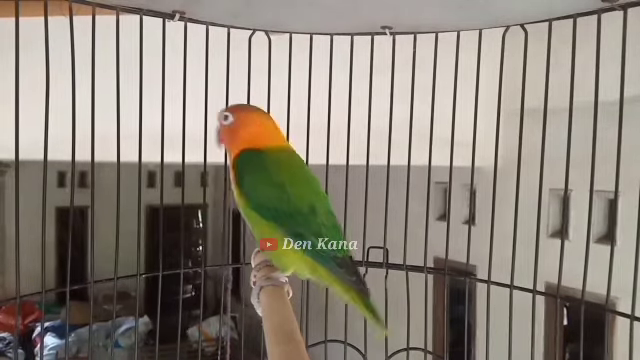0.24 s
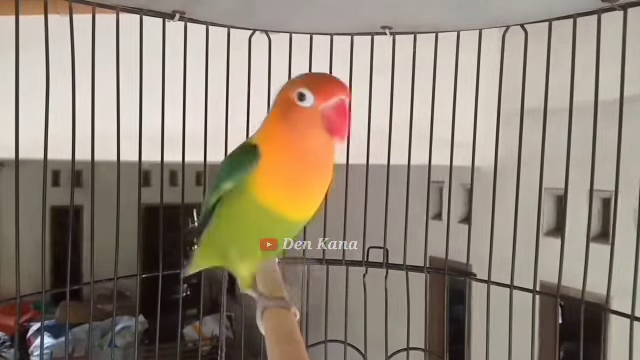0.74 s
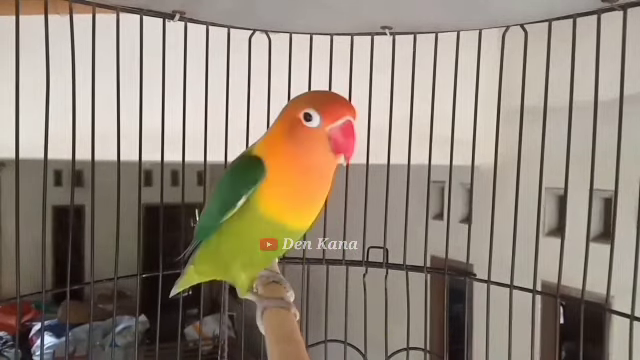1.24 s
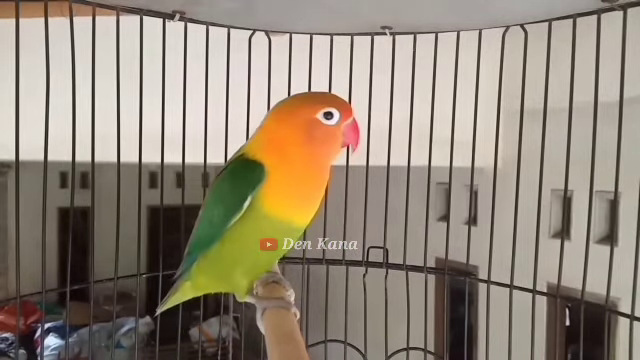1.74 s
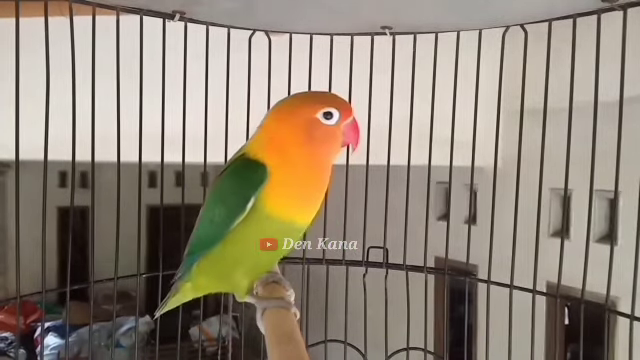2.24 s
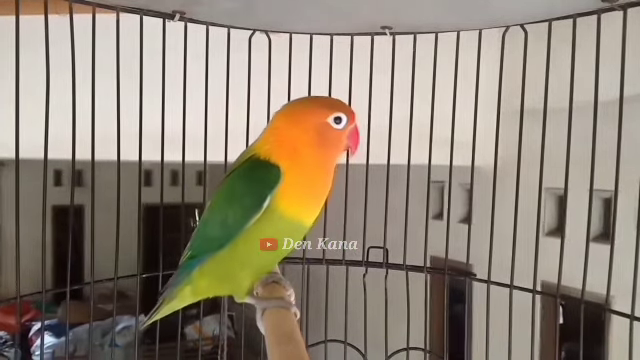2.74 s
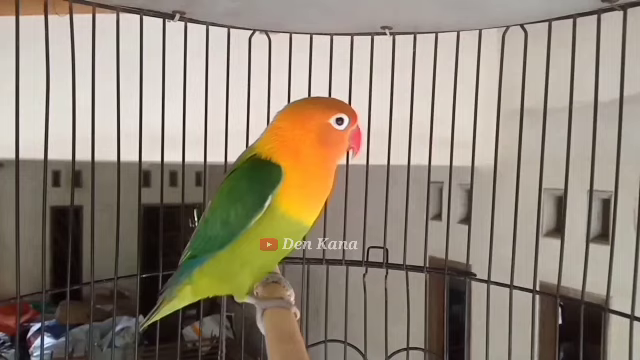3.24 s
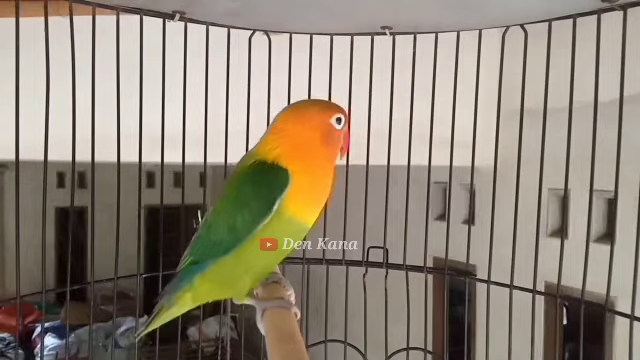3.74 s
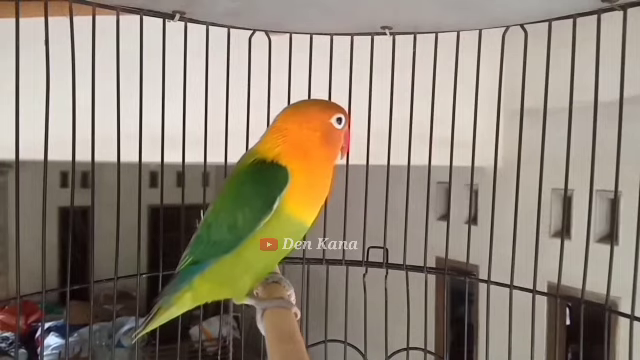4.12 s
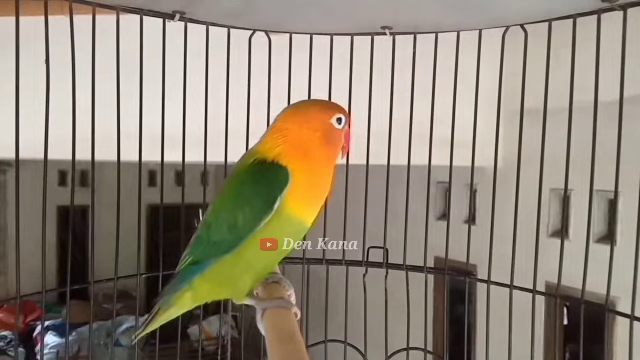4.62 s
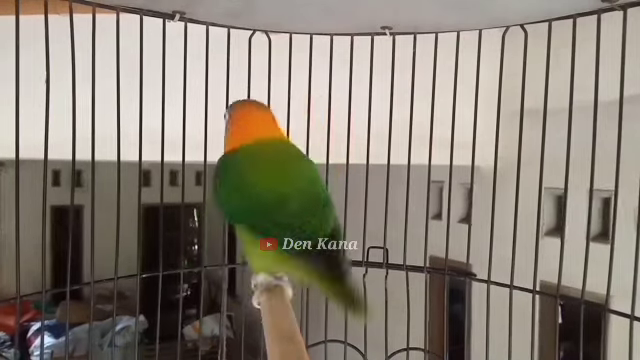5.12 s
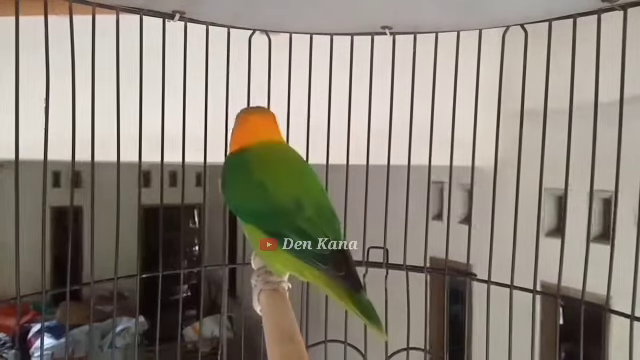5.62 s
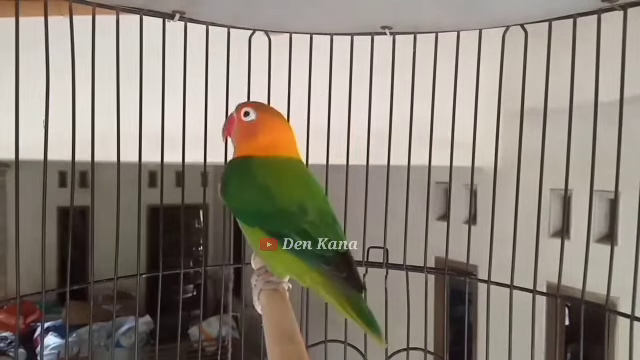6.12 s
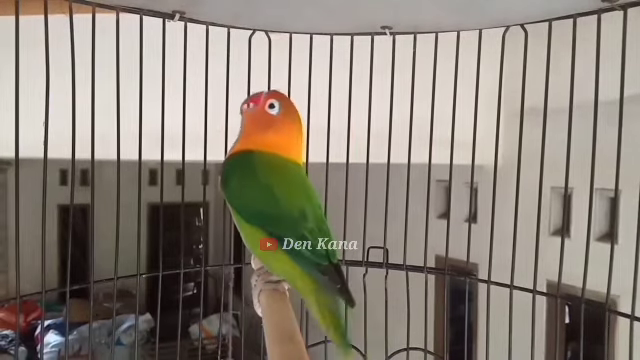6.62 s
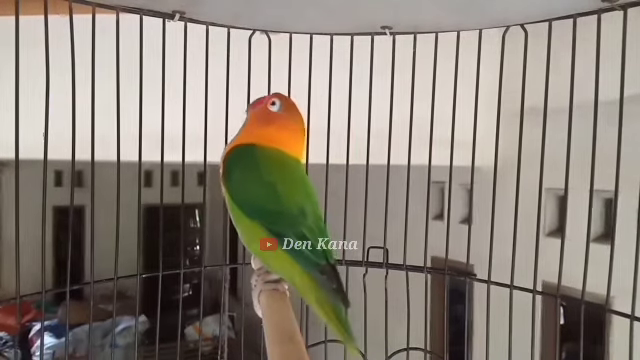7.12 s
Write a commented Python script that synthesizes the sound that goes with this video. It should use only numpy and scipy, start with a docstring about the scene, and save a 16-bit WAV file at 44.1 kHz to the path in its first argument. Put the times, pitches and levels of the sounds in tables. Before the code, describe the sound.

A caged lovebird gives four sharp, widely spaced chirps in a ringing hard-walled room, then a quick yelp and a rapid chattering trill.

```python
"""A hard-walled room, with a caged lovebird close to a phone's microphone.
The bird gives four sharp chirps, each a rasp that locks into a gliding tone, amid small taps of beak and claws.
Then it yelps and breaks into fast chatter: tiny voiced pips, single then paired, shaped by throat and beak.
The room rings after each; behind lie air, rumble, a low wavering hum, a thin whine and a faint far sizzle."""
import sys
import numpy as np
from scipy import signal
from scipy.fft import rfft, irfft
from scipy.io import wavfile

SR = 44100
rng = np.random.default_rng(int(sys.argv[2]) if len(sys.argv) > 2 else 0)


def wav_record(signal):
    """Record a signal, one row per channel, as 16-bit PCM in the file named by sys.argv[1]."""
    frames = np.transpose(np.atleast_2d(signal))
    bounded = np.clip(frames, -1, 1)
    # unit amplitude maps onto the largest positive 16-bit level
    quanta = np.round(bounded * 32767).astype(np.int16)
    wavfile.write(sys.argv[1], SR, quanta)


N = 324576
TIME = np.arange(N) / SR  # s

# spectrum of the room air: [f/Hz, relative level/dB]
AIR_SPECTRUM = [(15, -50.5), (25, -40.5), (76, -2), (206, -8), (373, -9.5), (439, -10.5), (734, -16.5),
                (1290, -17), (2990, -24.5), (3430, -20.5), (4250, -32.5), (7920, -28), (11600, -46),
                (13600, -34.5), (16000, -62)]
# air and low rumble under everything, before their trims: [t/s, air level/dB, rumble level/dB]
BACKGROUND_LEVELS = [(0.0, -57, -59), (0.49, -58, -62), (1.41, -58.5, -57), (1.64, -60, -62),
                     (3.32, -60, -56.5), (3.81, -63, -60), (4.1, -60.5, -53.5), (7.36, -64, -69)]
# the low hum sags, picks up and sags again: [t/s, f/Hz]
HUM_PITCH_PATH = [(0, 170.1), (2, 165.1), (5.15, 139.3), (5.45, 164.5), (6.4, 155.6)]
# swells and lulls of the hum: [centre t/s, half width/s, level change/dB]
HUM_LEVEL_SWELLS = [(.9, .7, -5), (2.95, .27, 11.5), (4.75, 0.26, 8), (5.9, .45, 4), (6.9, 0.62, -7)]
# steady narrow tones, low and high: [f/Hz, width/Hz, level/dB, silent from t/s]
STEADY_TONES = [(202, 2.1, -63.5, 1.35), (436, 14, -62.5, 1.9), (442.7, 41, -67, 5.9),
                (347.6, 3.5, -70.5, 6.7), (3354, 12, -70, 2.8), (13450, 130, -76.5, 6.5)]
# spectrum of the far sizzle: [f/Hz, relative level/dB]
SIZZLE_SPECTRUM = [(1180, -41.5), (2000, -20), (2620, -5.5), (3010, -3), (3740, -10.5), (4150, -11),
                   (4940, -20.5), (6420, -31), (6640, -13.5), (8930, -7.5), (12700, -21.5), (13800, -15),
                   (16000, -29.5)]
# thin tones inside the sizzle: [f/Hz, level above the sizzle/dB]
SIZZLE_PEAKS = [(2923, 11.5), (3400, 13), (4070, 8), (5250, 11), (6837, 12), (7430, 11), (8664, 3.5),
                (8818, 7), (9207, 4), (10470, 6.5), (11040, 3), (11364, 11), (12080, 8.5), (14180, 7.5)]
# swell of the sizzle: [t/s, level/dB]
SIZZLE_SWELL = [(0, -77.5), (2.5, -73), (3.2, -63), (4.4, -61), (5.1, -57.5), (5.6, -58), (5.85, -67.5),
                (7.36, -74)]
# ring of the room by band: [f/Hz, relative level/dB, decay time to -60 dB/s]
ROOM_RING = [(500, -8, .5), (1500, -1, .65), (3000, -.5, .75), (5000, .5, .76), (7000, .5, .62),
             (9500, 1, .52), (15000, 3, .45)]
# reflections from nearby surfaces: [delay/s, gain/dB]
NEAR_ECHOES = [(.0016, -9.5), (.0027, -15.5), (.0046, -23), (.0083, -23.5), (0.0132, -22.5)]
# beak and claw taps: [t/s, level before decay/dB, centre f/Hz]
TAP_EVENTS = [(.518, -46, 1910), (.742, -63, 11000), (0.81, -56, 10000), (.842, -67, 10140),
              (2.5405, -37.5, 2950), (3.683, -59, 1510), (5.018, -49, 9000), (5.283, -53, 9000)]
# throat colour of the opening scrape: [f/Hz, gain/dB]
SCRAPE_COLOUR = [(800, -28), (1450, -19), (1900, -11), (2400, -17), (3200, -2.5), (4300, -11), (5200, -7),
                 (6100, -11), (7200, 4), (8800, -9), (12000, -9), (16000, -17)]
# throat colour of the chirp's squeak and tone: [f/Hz, gain/dB]
CHIRP_COLOUR = [(800, -41.5), (1450, -29), (1950, -13), (2550, -29), (3300, -11), (3900, -13.5),
                (4500, -2.5), (5500, -0.5), (6200, -15), (7400, 6), (8600, -10.5), (10300, -2),
                (12300, -14.5), (14500, -9), (16000, -19.5)]
# chirps: [t/s, scrape level/dB, tone delay/s, tone length/s, tone level/dB, start f/Hz, end f/Hz, treble/dB]
CHIRP_EVENTS = [(0.55, -31, .004, .012, -18, 2600, 2790, -7),
                (1.615, -18, 0.0089, 0.024, -17, 2574, 2406, 0.5),
                (2.568, -24.5, .0066, .036, -15, 2400, 2743, 1.5),
                (3.702, -23, .0104, 0.032, -14.5, 2298, 2750, -4.5)]
# short squeaks by the scrape and tone: [t/s, level/dB, start f/Hz, end f/Hz, treble/dB]
SQUEAK_EVENTS = [(.5515, -16.5, 4540, 4480, -17), (1.6175, -14.5, 3150, 3680, -7),
                 (2.5705, -26, 3580, 3785, -3), (3.7055, -28.5, 3650, 3690, -6)]
# throat colour of the yelp: [f/Hz, gain/dB]
YELP_COLOUR = [(800, -62), (1650, -8.5), (2400, -4), (3900, -2.5), (5000, -8.5), (6200, -18), (7500, -9.5),
               (9200, -24.5), (11500, -26.5), (14000, -53)]
# two-part yelp: [t/s, length/s, level/dB, start f/Hz, end f/Hz, roughness 0-1, odd harmonics/dB, treble/dB]
YELP_NOTES = [(6.102, 0.00717, -15.5, 2700, 2243, .56, -6, -1),
              (6.118, .016, -16.5, 2400, 1700, .33, -3, -1)]
# throat colour of the chatter: [f/Hz, gain/dB]
PIP_COLOUR = [(700, -32), (1100, -21), (1500, -30), (1950, -7), (2550, -5.5), (3100, 2.5), (5000, 0.5),
              (6500, -2), (8600, 3), (9900, -19.5), (11200, -12.5), (12900, -10.5), (14200, -28),
              (15200, -18), (16000, -35)]
# chatter, sharp pip: [t/s, length/s, level/dB, beak resonance f/Hz, harshness 0-1],
# then its soft pip: [length/s (near 0 = silent), level/dB, beak resonance f/Hz]
CHATTER_SYLLABLES = [(6.297, .0045, -18, 2800, .55, 0.000055, 0, 2),
                     (6.358, .006, -15, 3820, .95, 0, -2, 0), (6.4174, .005, -16.5, 3100, .45, 0, 0, 0),
                     (6.4793, .0058, -14, 4400, .55, 0.0053, -25, 3300),
                     (6.5392, .0085, -14, 4500, .55, 0.01, -20, 2960),
                     (6.6013, .0083, -14, 3480, .25, .007, -21.5, 2702),
                     (6.6658, .0054, -14.5, 4670, .9, .0058, -21.5, 2950),
                     (6.7284, .0058, -15.5, 4200, 1, .007, -23, 3630),
                     (6.7942, .0068, -14.5, 4400, .9, 0.0043, -19, 2949),
                     (6.8544, 0.0045, -16.5, 4100, .9, 0.0086, -19, 3098),
                     (6.9204, .0042, -12.5, 4900, .55, .004, -24.5, 3400),
                     (6.987, .007, -13.5, 4800, .45, .005, -19.5, 2800),
                     (7.0548, 0.0055, -17, 3300, .18, 0.0059, -18, 3873),
                     (7.1244, .0052, -18, 3000, .85, 0.009, -18.5, 3150),
                     (7.19, .007, -14.5, 3480, .05, 0.0074, -22.5, 3650),
                     (7.2618, .0042, -14, 5100, .55, .0055, -19, 2698),
                     (7.329, .0048, -18, 3600, .9, 0.0046, -19.5, 2700)]

HUM_DB = -61  # before swells and waver

# the rough, broad scrape that opens a chirp
SCRAPE_S, SCRAPE_START_HZ, SCRAPE_END_HZ = .0112, 2000, 2800
SCRAPE_ROUGH, SCRAPE_ODD_DB, SCRAPE_TREBLE_DB = .85, 0, -1
SQUEAK_S, SQUEAK_ROUGH, SQUEAK_ODD_DB = .0088, .16, -4
# the tone needs a moment to lock, so a shorter one is rougher
TONE_LOCK_S, TONE_ODD_DB = .0017, -17

# the sharp pip sweeps up; a harsher one starts lower, is brighter and rings the beak less
SHARP_START_HZ, SHARP_REACH, SHARP_ARCH_OCTAVES = 2600, 1.08, .38  # start: before harshness and arch
SHARP_ROUGH, SHARP_JITTER = .66, .025
SHARP_TREBLE_DB, SHARP_BEAK_DB = -8.3, 14  # at no harshness
HARSH_DROP_OCTAVES, HARSH_TREBLE_DB, HARSH_BEAK_DB = .85, 7.5, -7
# the soft pip's middle lies ahead of the sharp one; the longer it is, the rougher
SOFT_LEAD_S, SOFT_PITCH_SHARE, SOFT_GLIDE_OCTAVES = .0098, .9, .3
SOFT_TREBLE_DB, SOFT_ROUGH_PER_S = -7.5, 120
# later in the chatter, a faint copy of the soft pip runs ahead of it
STUTTER_FROM_S, STUTTER_LEAD_S, STUTTER_DB = 6.82, .006, -10

TOP_HZ = 15550  # top of the microphone's range


def undb(db):
    """Turn dB into an amplitude factor."""
    return 10 ** (np.asarray(db) / 20)


def level(x, db=0):
    """Set the rms level."""
    return x * undb(db) / np.sqrt(np.mean(x ** 2) + 1e-20)


def curve(rows):
    """The columns of a time table, one value a sample."""
    s, *columns = np.transpose(rows)
    return [np.interp(TIME, s, c) for c in columns]


def colour(hz, points):
    """Read [f/Hz, dB] points on a log-frequency axis."""
    f, db = np.transpose(points)
    return np.interp(np.log(hz + 1), np.log(f), db)


def noise(gain, size):
    """Noise of unit rms whose spectrum is shaped by gain(Hz)."""
    spectrum = rfft(rng.standard_normal(size))
    hz = np.arange(size // 2 + 1) * SR / size
    return level(irfft(spectrum * gain(hz), size))


def bell(centre_hz, width_hz):
    """A resonance curve, down to half amplitude at width_hz either side."""
    return lambda hz: 1 / (1 + ((hz - centre_hz) / width_hz) ** 2)


def treble_rise(hz, from_hz, span_hz):
    """A ramp from 0 to 1 that brings in a treble shelf."""
    return np.clip((hz - from_hz) / span_hz, 0, 1)


def add(out, s, x):
    """Mix x in from time s."""
    i = int(s * SR)
    out[i:i + len(x)] += x[:max(0, N - i)]


def wavering_hum(waver_db=2.4):
    """A low sine whose pitch and level both wander slowly around their set paths."""
    hz = curve(HUM_PITCH_PATH)[0] * (1 + 0.011 * noise(bell(0, 7.8), N))
    swells = sum(db * np.exp(-((TIME - s) / width) ** 2) for s, width, db in HUM_LEVEL_SWELLS)
    hum_db = HUM_DB + swells + waver_db * noise(bell(0, 7), N)
    return np.sqrt(2) * np.sin(2 * np.pi * np.cumsum(hz) / SR) * undb(hum_db)


def steady_tones(fade_s=0.78):
    """Narrow noise bands, heard as hums and a thin whine, each fading out in turn."""
    out = np.zeros(N)
    for f, width, db, end in STEADY_TONES:
        fade = np.clip((end - TIME) / fade_s, 0, 1)
        out += noise(bell(f, width / 2), N) * undb(db) * fade
    return out


def background(air_db=4, rumble_db=-2):
    """Broad room air and low rumble, both noise, with the hum and narrow tones."""
    air_level, rumble_level = curve(BACKGROUND_LEVELS)
    air = noise(lambda f: undb(colour(f, AIR_SPECTRUM)), N) * undb(air_level + air_db)
    rumble = noise(lambda f: bell(100, 35)(f) * np.clip(f / 75, 0, 1) ** 4, N)
    rumble = rumble * undb(rumble_level + rumble_db)
    return air + rumble + wavering_hum() + steady_tones()


def sizzle(width_hz=24, flicker_db=0.2):
    """A faint, far hiss: shaped noise with thin resonant tones in it that swells and sinks."""
    def gain(f):
        peaks = sum(db * bell(hz, width_hz)(f) for hz, db in SIZZLE_PEAKS)
        return undb(colour(f, SIZZLE_SPECTRUM) + peaks)

    flicker = flicker_db * noise(bell(0, 20), N)
    return noise(gain, N) * undb(curve(SIZZLE_SWELL)[0] + flicker)


def room_ring(build_s, treble_db):
    """Bands of noise that build up together and die each at its own rate."""
    t = TIME[:SR]
    hz, db, t60 = np.transpose(ROOM_RING)
    db = db + treble_db * treble_rise(hz, 4500, 3000)
    bins_hz = np.arange(SR // 2 + 1)  # one second of response: 1 Hz a bin
    ring = 0
    for k, share in enumerate(np.eye(len(hz))):
        band_gain = np.sqrt(np.interp(bins_hz, hz, share))  # neighbours crossfade at equal power
        band = irfft(rfft(rng.standard_normal(SR)) * band_gain, SR)
        ring = ring + undb(db[k] - 60 * t / t60[k]) * band
    return ring * (1 - np.exp(-t / build_s))


def room(x, tail_db=-11.0, early_db=-14, early_s=0.026, build_s=0.0055, direct_db=-1, treble_db=0,
         scatter_hz=4600):
    """Direct sound, close echoes, a short scatter from cage and ceiling, and a ring that dulls as it dies."""
    t = TIME[:SR]
    ring = room_ring(build_s, treble_db)
    scatter = noise(bell(scatter_hz, 11000), SR) * np.exp(-t / early_s) * np.clip(t / 0.0048, 0, 1)
    # dividing by sqrt(samples) makes each level the total energy of its part
    response = (level(ring, tail_db) + level(scatter, early_db)) / np.sqrt(SR)
    for delay, echo_db in NEAR_ECHOES:
        response[int(delay * SR)] += undb(echo_db)
    return undb(direct_db) * x + signal.fftconvolve(x, response)[:N]


def taps(ring_s=0.0034):
    """Light, dry ticks on perch and bars: bursts of banded noise that decay at once."""
    out, t = np.zeros(N), TIME[:1024]
    for s, db, hz in TAP_EVENTS:
        add(out, s, undb(db) * noise(bell(hz, hz / 2), len(t)) * np.exp(-t / ring_s))
    return out


def syrinx(hz, gain_db, count=10):
    """Harmonics of a moving pitch, each weighted by gain_db(number, Hz)."""
    phase = 2 * np.pi * np.cumsum(hz) / SR
    out = 0
    for k in range(1, count + 1):
        below_nyquist = k * hz < SR / 2
        out = out + undb(gain_db(k, k * hz)) * below_nyquist * np.sin(k * phase)
    return out


def call_note(shape, length, db, start_hz, end_hz, rough, odd_db, treble_db,
              settle=3.2, jitter=0.1504, fade_db=6, rasp_db=-5):
    """The pitch settles as the membrane tension does; roughness jitters it and adds rasp."""
    size = int(length * SR)
    u = np.linspace(0, 1, size)  # progress through the note
    settled = (1 - np.exp(-settle * u)) / (1 - np.exp(-settle))
    hz = start_hz + (end_hz - start_hz) * settled
    hz = hz * np.exp(jitter * rough * noise(bell(0, 620), size))

    def throat(f):
        return colour(f, shape) + treble_db * treble_rise(f, 6000, 3500)

    tone = level(syrinx(hz, lambda k, f: throat(f) + odd_db * (k % 2)))
    rasp = rough * undb(rasp_db) * noise(lambda f: undb(throat(f)), size)
    # 1.4 ms attack, release over the last 26 % of the note
    edge = np.clip(np.minimum(u * length / 0.0014, (1 - u) / 0.26), 0, 1)
    swell = np.sin(np.pi / 2 * edge) ** 2
    return level((tone + rasp) * swell * undb(-fade_db * u), db)


def chirps():
    """Each chirp is a scrape, a squeak and a clean gliding tone in quick succession."""
    out = np.zeros(N)
    for s, scrape_db, after, length, db, start_hz, end_hz, treble_db in CHIRP_EVENTS:
        scrape = call_note(SCRAPE_COLOUR, SCRAPE_S, scrape_db, SCRAPE_START_HZ, SCRAPE_END_HZ,
                           SCRAPE_ROUGH, SCRAPE_ODD_DB, SCRAPE_TREBLE_DB)
        tone = call_note(CHIRP_COLOUR, length, db, start_hz, end_hz,
                         TONE_LOCK_S / length, TONE_ODD_DB, treble_db)
        add(out, s, scrape)
        add(out, s + after, tone)
    for s, db, start_hz, end_hz, treble_db in SQUEAK_EVENTS:
        squeak = call_note(CHIRP_COLOUR, SQUEAK_S, db, start_hz, end_hz,
                           SQUEAK_ROUGH, SQUEAK_ODD_DB, treble_db)
        add(out, s, squeak)
    return out


def yelp():
    """A short bark and a falling note, both from the syrinx, open the chatter."""
    out = np.zeros(N)
    for s, *note in YELP_NOTES:
        add(out, s, call_note(YELP_COLOUR, *note, settle=2.48, fade_db=3))
    return out


def pip(length, db, pitch_hz, glide, beak_hz, treble_db, rough,
        arch=0.29, beak_db=11, jitter=0.04, rasp_db=-15, smooth_db=-30):
    """An arched pitch sweeps its harmonics through the beak resonance; rough pips double their period."""
    size = int(length * SR)
    u = np.linspace(0, 1, size)  # progress through the pip
    wander = jitter * rough * noise(bell(0, 720), size)
    octaves = glide * (u - .5) - arch * (2 * u - 1) ** 2 + wander
    hz = pitch_hz * 2 ** octaves

    def throat(f):
        beak = beak_db * bell(beak_hz, 500)(f)
        return colour(f, PIP_COLOUR) + beak + treble_db * treble_rise(f, 4500, 3000)

    # at half pitch, the odd harmonics are the period doubling; a smooth pip hides them
    doubling_db = smooth_db * max(1 - rough, 0)
    tone = level(syrinx(hz / 2, lambda k, f: throat(f) + (k % 2) * doubling_db, count=16))
    rasp = undb(rasp_db) * noise(lambda f: undb(throat(f)), size)
    return level((tone + rasp) * np.abs(np.sin(np.pi * u)) ** 1.2, db)


def soft_pip(length, db, beak_hz):
    """A duller pip with a shallower upward arch, pitched a little under its beak resonance."""
    rough = min(SOFT_ROUGH_PER_S * length, 1)
    return pip(length, db, SOFT_PITCH_SHARE * beak_hz, SOFT_GLIDE_OCTAVES, beak_hz,
               SOFT_TREBLE_DB, rough, beak_db=7.5)


def sharp_pip(length, db, beak_hz, harsh):
    """A rough, arched upward flick toward the beak resonance."""
    start_hz = SHARP_START_HZ * 2 ** (-HARSH_DROP_OCTAVES * harsh)
    glide = SHARP_REACH * np.log2(beak_hz / start_hz)
    middle_hz = start_hz * 2 ** (glide / 2)
    treble_db = SHARP_TREBLE_DB + HARSH_TREBLE_DB * harsh
    beak_db = SHARP_BEAK_DB + HARSH_BEAK_DB * harsh
    return pip(length, db, middle_hz, glide, beak_hz, treble_db, SHARP_ROUGH,
               arch=SHARP_ARCH_OCTAVES, beak_db=beak_db, jitter=SHARP_JITTER)


def chatter():
    """About sixteen syllables a second: single pips at first, then pairs, then pairs with a stutter."""
    out = np.zeros(N)
    for s, length, db, beak_hz, harsh, soft_length, soft_db, soft_hz in CHATTER_SYLLABLES:
        add(out, s, sharp_pip(length, db, beak_hz, harsh))
        if soft_length > 0:
            start = s - SOFT_LEAD_S - soft_length / 2
            add(out, start, soft_pip(soft_length, soft_db, soft_hz))
            if s > STUTTER_FROM_S:
                add(out, start - STUTTER_LEAD_S, soft_pip(soft_length, soft_db + STUTTER_DB, soft_hz))
    return out


def scene():
    """The bird chirps side-on, then turns its back to chatter, which throws more treble into the room."""
    behind = background() + sizzle()
    side_on = room(chirps() + taps())
    turned = room(yelp() + chatter(), tail_db=-9, early_db=-14.5, treble_db=5, scatter_hz=8500)
    return (behind + side_on + turned)[None]


def record(dry):
    """The phone's microphone rounds the loudest peaks, then a steep low-pass cuts the top."""
    rounded = .9 * np.tanh(dry / .9)
    low_pass = signal.ellip(10, .2, 80, TOP_HZ, fs=SR, output="sos")
    return signal.sosfilt(low_pass, rounded)


dry = scene()
out = record(dry)
wav_record(out)
```